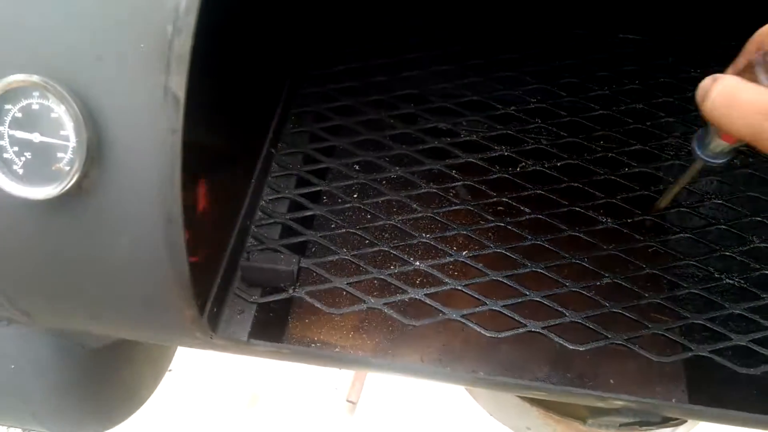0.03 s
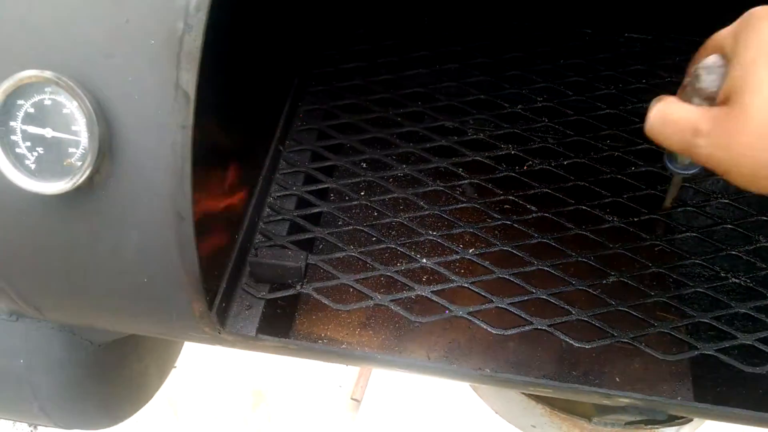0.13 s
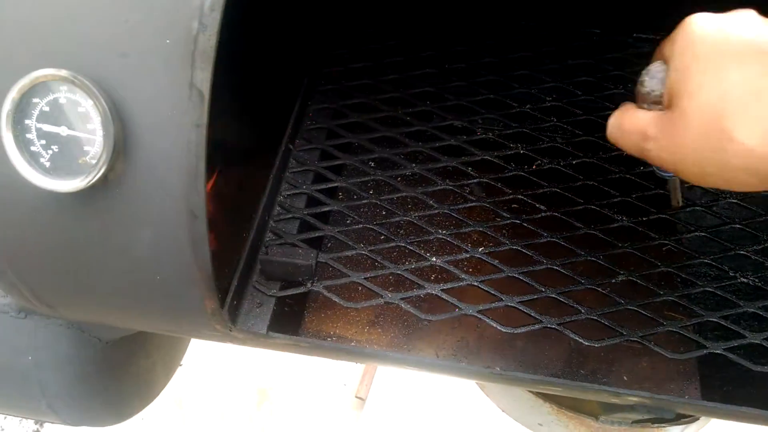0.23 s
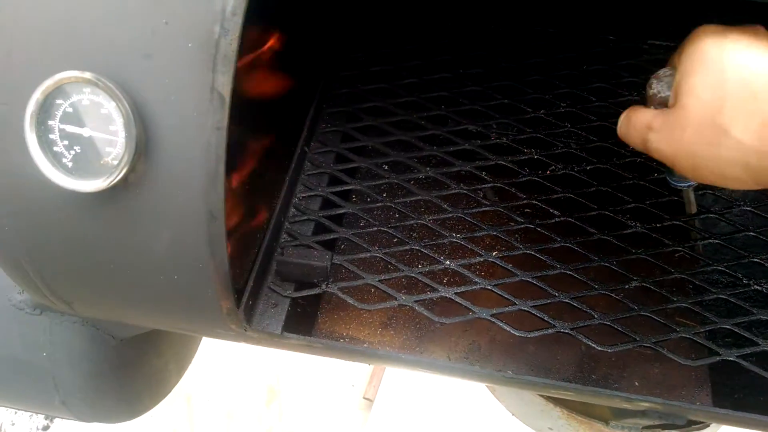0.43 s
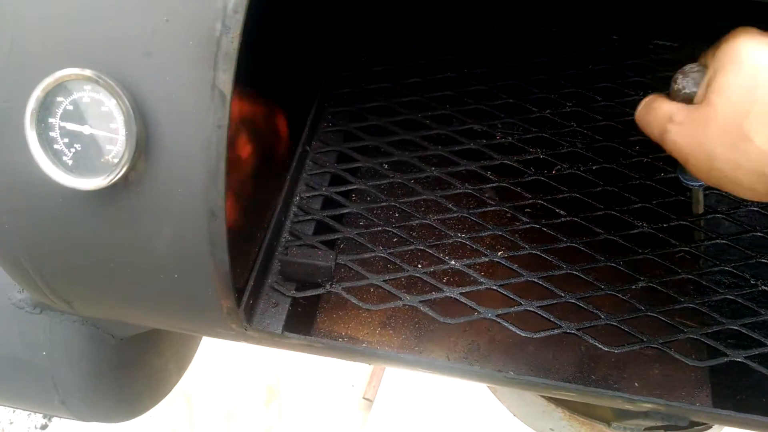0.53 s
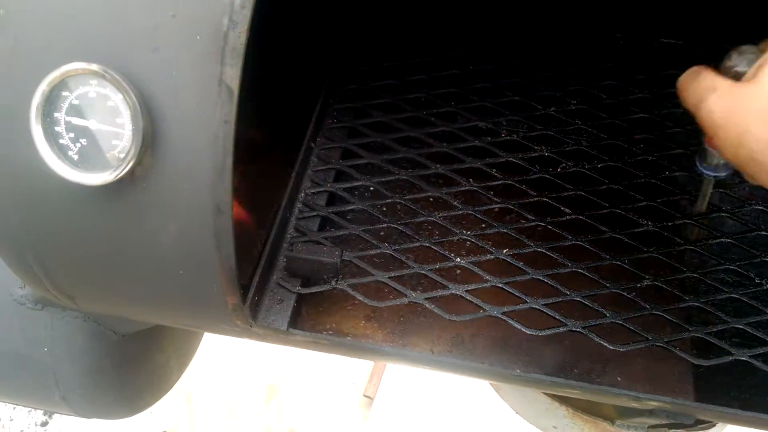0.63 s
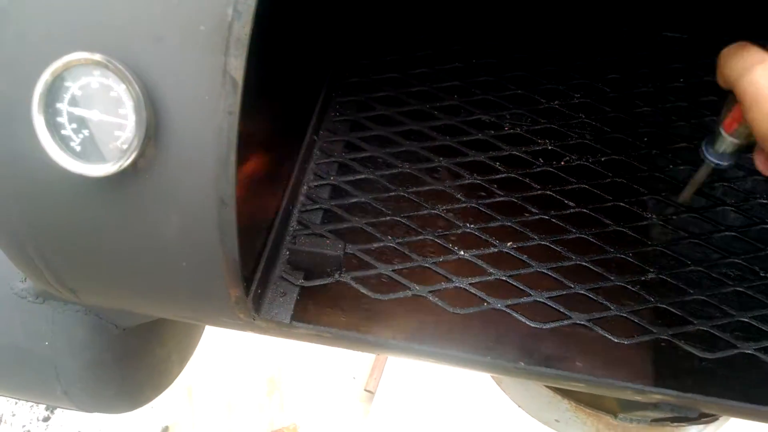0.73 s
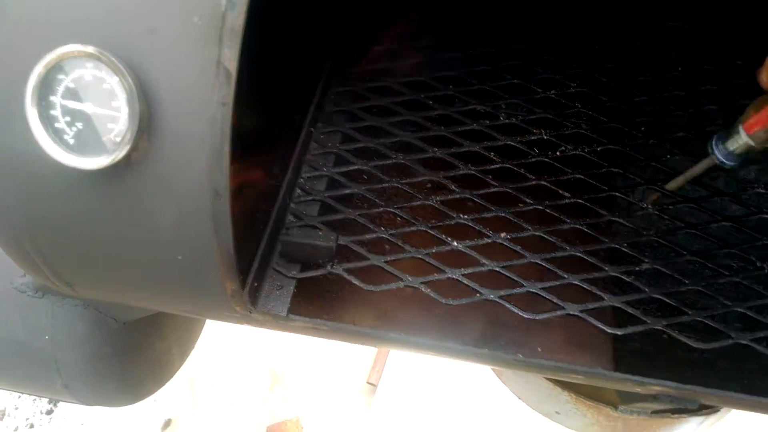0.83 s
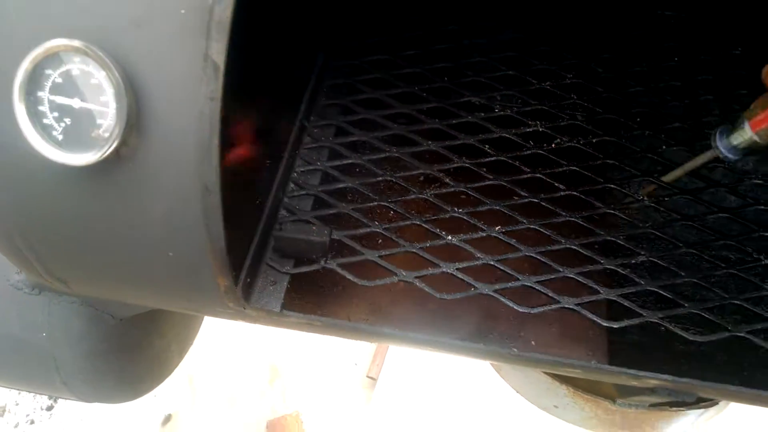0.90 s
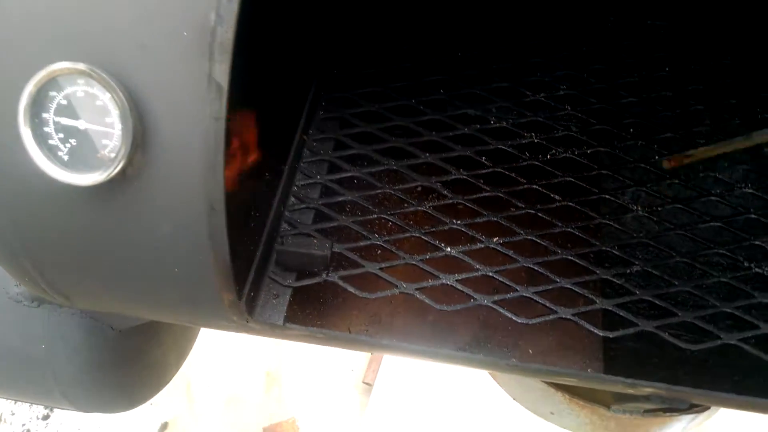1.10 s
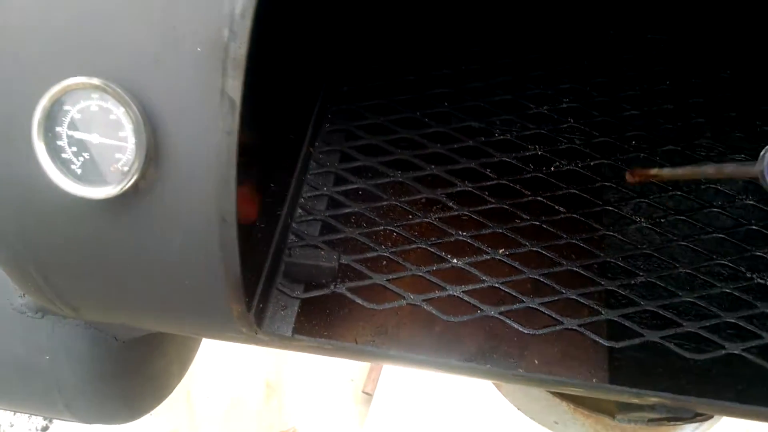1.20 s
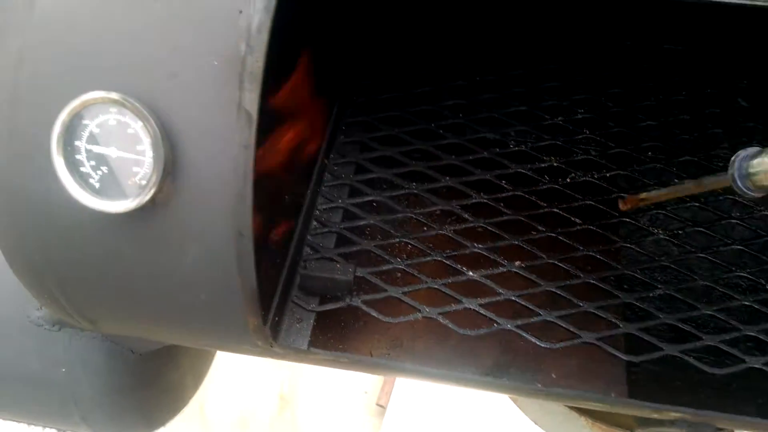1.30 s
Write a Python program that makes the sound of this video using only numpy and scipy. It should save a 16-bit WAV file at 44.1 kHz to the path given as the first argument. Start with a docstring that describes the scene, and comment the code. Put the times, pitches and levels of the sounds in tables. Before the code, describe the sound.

A screwdriver scrapes and clanks on a metal grate over a low fire rumble.

```python
"""A fire rumbles throughout, with a few sharp ticks, beside the expanded-metal grate of a barrel smoker.
A screwdriver touches down and drags lightly over the grate, setting a few wires singing; its tip slips
in tiny jerks, and grate and steel drum ring with them. At 0.54 s the tip lands again with a clank.
A hard stroke follows, snagging on the wires with dull knocks, then a short last one that ends at 1.2 s."""
import sys
import numpy as np
from scipy import signal
from scipy.fft import rfft, irfft, next_fast_len
from scipy.io import wavfile

SR = 44100
rng = np.random.default_rng(int(sys.argv[2]) if len(sys.argv) > 2 else 0)


def output_pcm(signal):
    """Save a mono or channel-first signal as 16-bit PCM at the path in sys.argv[1].

    Samples are clipped to [-1, 1] before scaling.
    """
    pcm = np.clip(np.atleast_2d(signal).T, -1, 1) * 32767
    wavfile.write(sys.argv[1], SR, np.round(pcm).astype(np.int16))


N = 59535
T = np.arange(N) / SR

# tone of the fire and air bed: frequency_hz, level_db
FIRE_TONE = [(20, -4), (60, -2.5), (100, 1), (150, 3), (300, -5.5), (1000, -5), (2500, -20.5),
             (6000, -19.5), (14000, -17)]
# cues of the dry ticks: start_s, level_db
TICK_CUES = [(0.0492, -2.5), (0.336, -7), (0.746, 0), (1.058, -8), (1.105, 1.5), (1.186, 0), (1.1868, -5),
             (1.1968, 4), (1.295, -11)]
# tone of a tick: frequency_hz, level_db
TICK_TONE = [(300, -36), (2000, -29), (5000, -4), (10000, -12.5), (13000, 0), (15500, 5.5)]

# decay of the echo inside the drum: frequency_hz, t60_s
DRUM_DECAY = [(150, 1), (500, 0.15), (1300, 0.24), (3500, 0.17), (9000, 0.051), (15000, 0.19)]
# modes of grate and drum, by where the tip is: pitch_hz, rim_level_db, inner_level_db
GRATE_MODES = [(152.7, -13, 6.5), (295.9, 5, 7.5), (327, -6, -4), (423, -16, -1), (437.3, -12, 4),
               (494.2, 1.5, 7), (677, -5.5, 5), (755, -24, 10.5), (820, 3, -10), (970, -3.5, 0.5),
               (999, 2, 3.5), (1180.6, 1.5, 0), (1252.5, -12, 8), (1399, -11, -1), (1872, 0, 3)]
RIM, INNER = 1, 2  # level columns of GRATE_MODES
# wires that sing under the light stroke, plus the short ring of a wire struck by the snag at 0.3 s: start_s,
# end_s, pitch_hz, level_db
SINGING_WIRES = [(0.0, 0.39, 940, -39.5), (0.0, 0.1, 970, -40.5), (0.278, 0.614, 964, -45.5),
                 (0.242, 0.59, 1782, -47), (0.309, 0.34, 467, -34.5), (0.31, 0.55, 487, -48)]
# envelope of the rasp around them: time_s, level_db
RASP_ENVELOPE = [(0.0, -57), (0.102, -41), (0.16, -23.5), (0.27, -37), (0.34, -57)]

# cues of the snags: start_s, level_db
KNOCK_CUES = [(0.303, -10.5), (0.316, -9.5), (0.845, -3), (0.854, 2.5), (0.8637, -24), (0.8664, -14),
              (0.8761, 1), (0.883, -21)]
# tone of a snag's knock: frequency_hz, level_db
KNOCK_TONE = [(50, -46), (105, -40), (220, -11), (296, 11), (450, 15.5), (620, 4), (760, 6), (1200, -8),
              (2200, -6), (5000, -14), (14000, -12)]
# cues of the tip landing: start_s, level_db, t60_s
TAP_CUES = [(0.027, -12.5, 0.07), (0.536, 2.5, 0.25)]
# tone of a tap: frequency_hz, level_db
TAP_TONE = [(60, -35), (230, -11), (490, -1), (700, -5), (1000, 3), (1600, -4), (2500, 5.5), (4300, -5),
            (4900, -13.5), (6200, -2), (9000, -3.5), (15000, -15)]
# resonances of blade and wire: pitch_hz, width_hz, boost_db
BLADE_RESONANCES = [(507.5, 59, 13.8), (950, 56, 15), (1144, 110, 7.5), (1934, 58, 19.2), (2093, 95, 14.8),
                    (2790, 90, 12.6), (3084, 190, 10.6), (4270, 400, 12.6), (5570, 520, 12.6),
                    (8120, 190, 11), (11450, 300, 9.5)]

# borders of the scrape's four bands (thrum, rasp, grit, fizz): edge_hz
BAND_EDGES = [20, 700, 2200, 9000, 17000]
# trim on each band: gain_db
BAND_TRIMS = [-1.5, 0, 0.5, 1]
# band envelopes of the three strokes: time_s, thrum_db, rasp_db, grit_db, fizz_db
LIGHT_STROKE = [(0.0, -49, -32, -42, -51), (0.012, -41.5, -38, -40.5, -47), (0.045, -46, -44.5, -38, -46),
                (0.068, -43.5, -41, -50, -56), (0.098, -44, -38, -41, -45),
                (0.288, -38.5, -33.5, -41, -47.5), (0.306, -33, -32.5, -36, -42),
                (0.37, -41.5, -43.5, -52, -51.5), (0.45, -36, -42, -48, -45.5),
                (0.52, -38.5, -45.5, -56.5, -56)]
HARD_STROKE = [(0.61, -37.5, -52, -47, -42.5), (0.66, -40, -43.5, -46.5, -48.5),
               (0.686, -46.5, -39, -38, -34), (0.714, -25, -35, -34.5, -33.5),
               (0.74, -31, -37.5, -37, -36.5), (0.77, -31.5, -31.5, -31.5, -32.5),
               (0.862, -19.5, -18, -21, -27), (0.92, -26, -26.5, -27, -31), (0.96, -32, -24.5, -33, -36),
               (0.998, -27, -40.5, -48.5, -49), (1.03, -44, -34.5, -39.5, -46)]
LAST_STROKE = [(1.04, -52, -41, -51, -41.5), (1.076, -40, -34, -30.5, -33.5), (1.112, -30, -27, -29, -35),
               (1.162, -36.5, -26.5, -34.5, -36), (1.194, -38, -33.5, -32.5, -37),
               (1.204, -73, -77, -72, -66)]
# tone of the scrape under a light and a heavy hand: frequency_hz, level_db
LIGHT_TONE = [(40, -59), (100, -5), (135, -6), (210, 0), (290, -3.5), (480, -3.5), (620, -2), (800, -5),
              (1000, -5), (1380, -4), (1650, -7.5), (2100, -7), (2700, -3), (4000, -8), (5500, -15),
              (6800, -13), (12500, -16.5), (15000, -12.5), (16000, -24)]
HEAVY_TONE = [(40, -19), (100, -14), (135, 2.5), (230, -3), (296, -0.5), (355, -5.5), (460, 2), (590, -4),
              (750, -4), (880, -5), (1020, -8.5), (1400, -9), (2000, -13.5), (2700, -1.5), (4000, -3),
              (5500, -6.5), (6800, -5), (9000, -7.5), (12500, -8.5), (15000, -8.5), (16000, -13.5)]

# phase between the two microphone ports: frequency_hz, left_lead_rad
PORT_PHASE = [(0, 0), (1550, -0.2), (2240, -3.3), (2840, -3.0), (3620, 0.2), (4130, 0.0), (4740, -2.6),
              (6890, -7.2), (7580, -9.7), (8180, -9.5), (8700, -12.5), (9560, -13.0), (10100, -16.1),
              (10600, -16.2), (15000, -27.9), (15800, -28.9)]
# how alike the ports sound: frequency_hz, likeness_0_to_1
PORT_LIKENESS = [(30, .4), (130, .95), (600, .93), (1350, .96), (1850, .25), (2500, .95), (3200, .45),
                 (4000, .75), (4500, .4), (5100, .9), (6000, .55), (10000, .4), (15000, .7)]
# balance between the ports: frequency_hz, left_minus_right_db
PORT_BALANCE = [(30, 14), (130, -5), (280, -2), (520, -5.5), (1000, 0), (2000, 4), (4000, 0), (12000, 1.5)]


def amp(db):
    """Decibels to gain."""
    return 10 ** (np.asarray(db) / 20)


def unit(x):
    """Scales to rms 1."""
    return x / np.sqrt(np.mean(x ** 2) + 1e-20)


def read(points, hz):
    """Reads a table on a log-frequency axis."""
    f, value = np.transpose(points)
    return np.interp(np.log(hz + 1), np.log(f + 1), value)


def eq(x, gain):
    """Filters by a gain given as a function of frequency."""
    size = next_fast_len(x.shape[-1] + 4096)
    return irfft(rfft(x, size) * gain(np.fft.rfftfreq(size, 1 / SR)), size)[..., :x.shape[-1]]


def add(mix, start_s, sound):
    """Drops a stereo sound into the mix at its cue."""
    part = mix[:, max(round(start_s * SR), 0):][:, :sound.shape[1]]
    part += sound[:, :part.shape[1]]


def envelope(times, db, fade_s=.025):
    """Gain through breakpoints, fading in before the first and out after the last."""
    outside_s = np.maximum(np.maximum(times[0] - T, T - times[-1]), 0)
    return amp(np.interp(T, times, db)) * np.exp(-outside_s / fade_s)


def wobble(below_hz):
    """Slow random modulation of rms 1."""
    return unit(eq(rng.standard_normal(N), lambda hz: 1 / (1 + (hz / below_hz) ** 4)))


def burst(t60_s):
    """Dense dying reflections of energy 1, different in each channel."""
    reflections = rng.choice([-1., 1.], (2, N // 2)) * amp(-60 * T[:N // 2] / t60_s)
    return reflections / np.linalg.norm(reflections[0])


def fire(level_db=-46, flicker_db=1):
    """The bed: a low, gently flickering rumble with a little hiss."""
    flicker = amp(flicker_db * wobble(below_hz=18))
    rumble = eq(rng.standard_normal((2, N)), lambda hz: amp(read(FIRE_TONE, hz)))
    return amp(level_db) * unit(rumble * flicker)


def ticks():
    """Short bright snaps with almost no ring."""
    snaps = np.zeros((2, N))
    for start_s, db in TICK_CUES:
        add(snaps, start_s, amp(db) * burst(t60_s=.0059))
    return eq(snaps, lambda hz: amp(read(TICK_TONE, hz)))


def drum_echo(diffuse_from_hz=334):
    """The steel drum's diffuse tail, with a low cut: in the bass it rings only in single modes."""
    hz, t, spectrum = signal.stft(rng.choice([-1., 1.], (2, N // 2)), SR, nperseg=256)
    decay = amp(-60 * t / read(DRUM_DECAY, hz)[:, None])
    tail = signal.istft(spectrum * decay, SR, nperseg=256)[1][:, :N // 2]
    tail = signal.sosfilt(signal.butter(2, diffuse_from_hz, "high", fs=SR, output="sos"), tail)
    return tail / np.linalg.norm(tail[0])


def grate_body(place, echo_db, ring_db, bass_t60_s=.52, half_ring_hz=1520):
    """One jolt on the grate: direct sound, the drum's echo and ringing modes, the high ones dying first."""
    t = T[:N // 2]
    response = ((t == 0) + amp(echo_db) * drum_echo()) / np.hypot(1, amp(echo_db))
    for mode in GRATE_MODES:
        pitch_hz, db = mode[0], mode[place]
        decay_per_s = np.log(1000) / bass_t60_s * (1 + (pitch_hz / half_ring_hz) ** 2)
        ring = np.cos(2 * np.pi * pitch_hz * t) * np.exp(-decay_per_s * t)
        response += amp(ring_db + db) * ring * 2 * decay_per_s / SR  # dB sets the resonant peak
    return response


def singing_wires(waver_hz=3.6, rasp_hz=1363, rasp_width_hz=150, rasp_gain_db=-7):
    """Light rubbing keeps a few wires singing at a near-steady pitch, under a broader rasp; the snag at 0.3 s
    leaves one wire ringing briefly."""
    noise = rng.standard_normal((2, N))
    rasp = unit(eq(noise, lambda hz: 1 / (1 + (2 * (hz - rasp_hz) / rasp_width_hz) ** 4)))
    out = rasp * amp(rasp_gain_db) * envelope(*np.transpose(RASP_ENVELOPE))
    for start_s, end_s, pitch_hz, db in SINGING_WIRES:
        cycles = np.cumsum(pitch_hz + waver_hz * wobble(below_hz=25)) / SR
        note = unit(np.sin(2 * np.pi * (cycles + rng.random((2, 1)))))
        out += note * envelope([start_s, end_s], [db, db])
    return out


def knocks(gain_db=12):
    """The tip snags on a wire and lets go with a dull knock that shakes the whole grate."""
    jolts = np.zeros((2, N))
    for start_s, db in KNOCK_CUES:
        add(jolts, start_s, amp(gain_db + db) * burst(t60_s=.017))
    thuds = eq(jolts, lambda hz: amp(read(KNOCK_TONE, hz)))
    return signal.fftconvolve(thuds, grate_body(INNER, echo_db=-8, ring_db=-.5), axes=1)[:, :N]


def taps(gain_db=7.5, half_ring_hz=14100):
    """The tip lands with a dense, dry clank, coloured by blade and wire; the grate rings on."""
    def tone(hz):
        peaks_db = sum(db / (1 + (2 * (hz - pitch) / width) ** 2) for pitch, width, db in BLADE_RESONANCES)
        return amp(read(TAP_TONE, hz) + peaks_db)
    out = np.zeros((2, N))
    for start_s, db, t60_s in TAP_CUES:
        hz, t, spectrum = signal.stft(burst(t60_s), SR, nperseg=128)
        treble_damping = amp(-60 * t / t60_s * hz[:, None] / half_ring_hz)
        clank = signal.istft(spectrum * treble_damping, SR, nperseg=128)[1]
        ringing = signal.fftconvolve(clank, grate_body(RIM, echo_db=-12, ring_db=2), axes=1)
        add(out, start_s, amp(gain_db + db) * eq(ringing, tone))
    return out


def stroke(band_envelopes, tone, slips_per_s=5000, spread_db=2.5, contact_t60_s=.0098):
    """Irregular slips of the tip, mostly small, each a tiny crunch; each band rides its own envelope."""
    slipping = rng.random(N) < slips_per_s / SR
    slips = slipping * amp(spread_db * np.minimum(rng.exponential(1, N), 4))
    energy = signal.lfilter([1], [1, -amp(-60 / (contact_t60_s * SR)) ** 2], slips ** 2)
    crunch = np.sqrt(energy) * rng.choice([-1., 1.], (2, N))
    times, *band_levels = np.transpose(band_envelopes)
    force = np.zeros((2, N))
    for low_hz, high_hz, trim_db, db in zip(BAND_EDGES, BAND_EDGES[1:], BAND_TRIMS, band_levels):
        band = eq(crunch, lambda hz: amp(read(tone, hz)) * (hz >= low_hz) * (hz < high_hz))
        force += unit(band) * amp(trim_db) * envelope(times, db)
    return force


def scrape():
    """The lead: three screwdriver strokes drive grate and drum; the last is the driest."""
    strokes = [(stroke(LIGHT_STROKE, LIGHT_TONE), grate_body(RIM, echo_db=-3.5, ring_db=9)),
               (stroke(HARD_STROKE, HEAVY_TONE), grate_body(INNER, echo_db=-1.5, ring_db=2.5)),
               (stroke(LAST_STROKE, LIGHT_TONE), grate_body(RIM, echo_db=-3.5, ring_db=0))]
    return sum(signal.fftconvolve(force, body, axes=1)[:, :N] for force, body in strokes)


def microphone_ports(mix):
    """The stereo image: two spaced ports hear the low mids alike and the treble out of step."""
    hz = np.fft.rfftfreq(2 * N, 1 / SR)
    first, second = rfft(mix, 2 * N)
    likeness = np.clip(read(PORT_LIKENESS, hz), 0, .99)
    mid = first * np.sqrt((1 + likeness) / 2)
    side = second * np.sqrt((1 - likeness) / 2)
    # each port takes half of the level and phase offset
    pan = amp(read(PORT_BALANCE, hz) / 2) * np.exp(.5j * read(PORT_PHASE, hz))
    return irfft(np.array([(mid + side) * pan, (mid - side) / pan]), 2 * N)[:, :N]


def scene():
    """All layers, mixed at the microphone."""
    return microphone_ports(scrape() + knocks() + singing_wires() + taps() + ticks() + fire())


def record(dry):
    """A soft clip rounds off the highest peaks, then a steep high cut limits the band."""
    ceiling, high_cut_hz = .85, 15750
    rounded = dry / (1 + (dry / ceiling) ** 4) ** .25
    high_cut = signal.firwin(401, high_cut_hz, window=("kaiser", 9), fs=SR)
    return signal.oaconvolve(rounded, high_cut[None], "same")


dry = scene()
out = record(dry)
output_pcm(out)
```